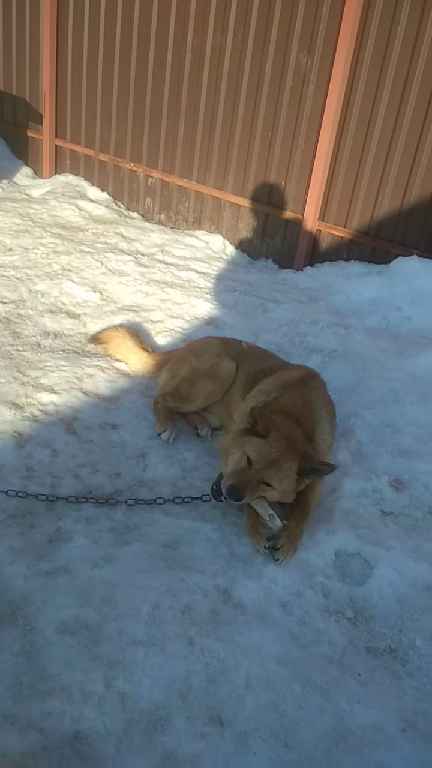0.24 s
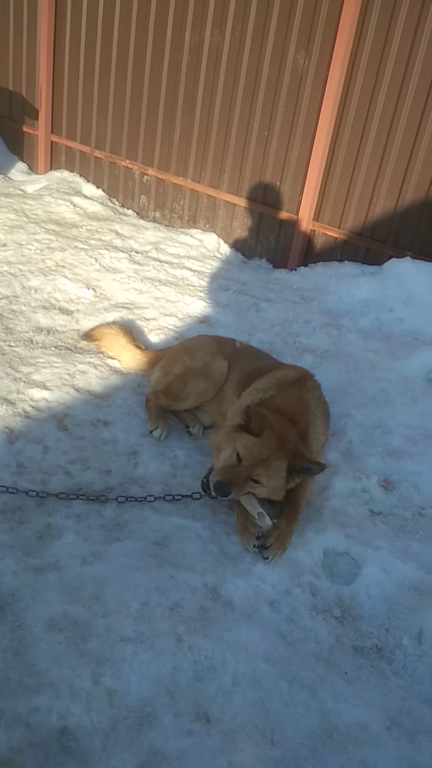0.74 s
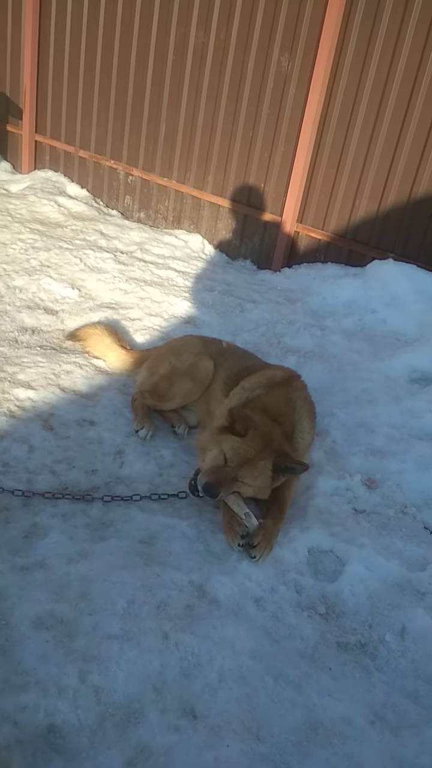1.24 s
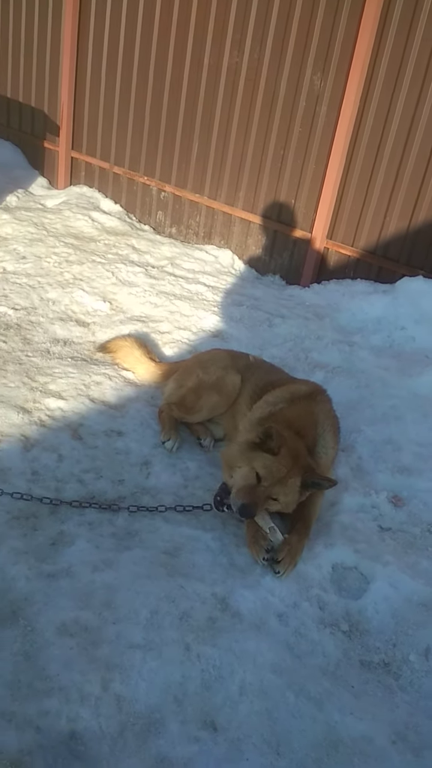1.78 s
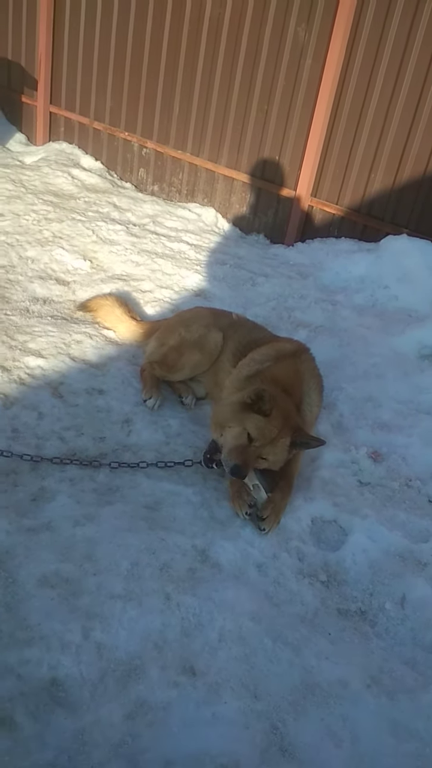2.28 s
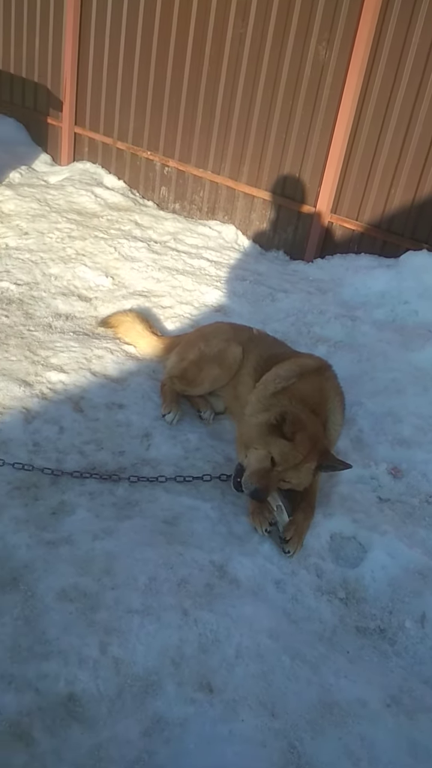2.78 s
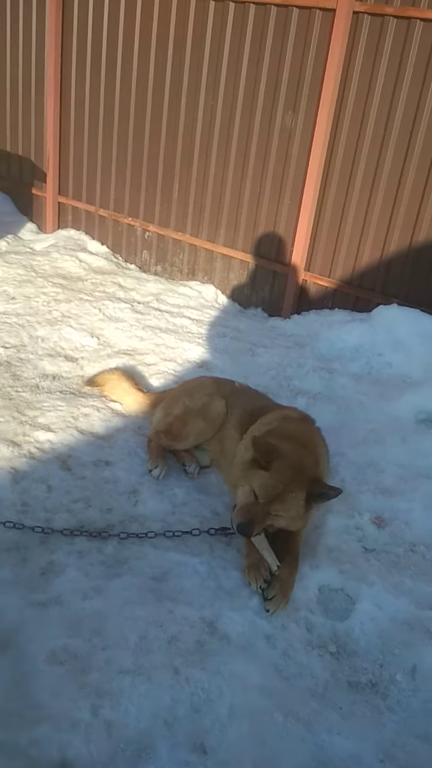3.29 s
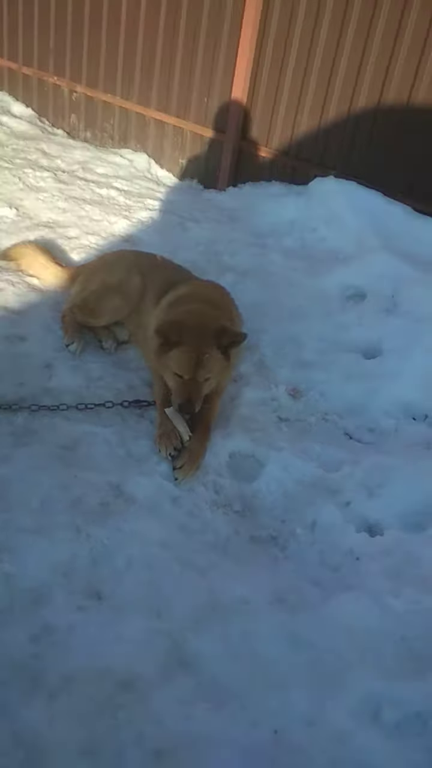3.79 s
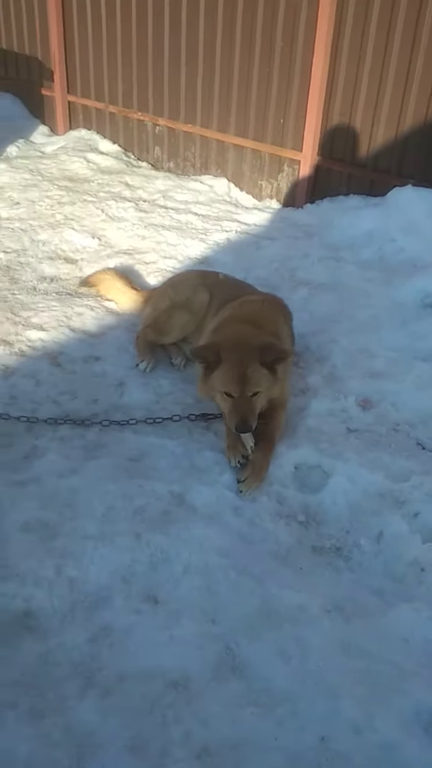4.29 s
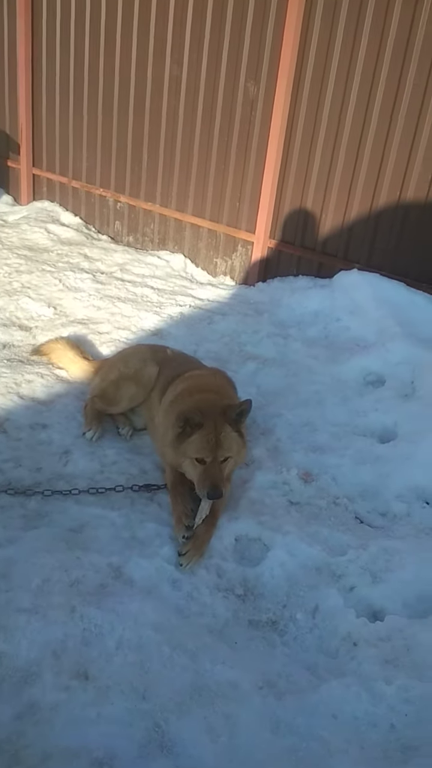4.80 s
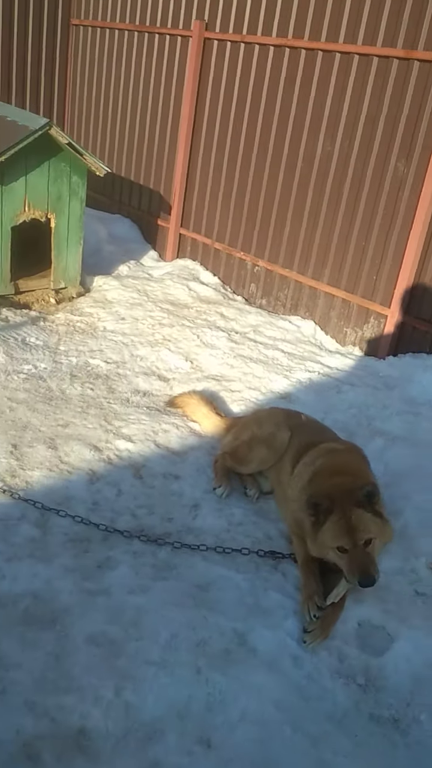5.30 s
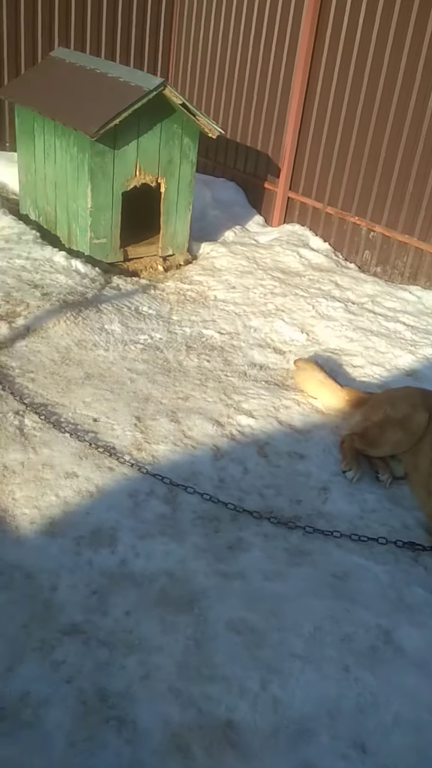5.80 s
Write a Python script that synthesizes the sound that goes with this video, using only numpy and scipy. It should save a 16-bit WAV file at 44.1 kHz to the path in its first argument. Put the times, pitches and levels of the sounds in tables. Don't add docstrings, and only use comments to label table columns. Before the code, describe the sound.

Teeth knock and splinter a hollow bone in uneven bites, with small chips and dry high ticks crowding the last seconds. Faint snow squeaks and rustles surround it, with light gusts rumbling low. Close to the left microphone, skin drags, hisses and pops on the case, strongest just before four seconds. A brief metallic chain grind comes late; the open yard adds only a slight echo.

```python
import sys
import numpy as np
from scipy import signal
from scipy.io import wavfile
from scipy.ndimage import uniform_filter1d, minimum_filter1d

SR = 44100
rng = np.random.default_rng(int(sys.argv[2]) if len(sys.argv) > 2 else 0)


def linear_from_db(decibels):
    return 10 ** (np.asarray(decibels, float) / 20)


def digitize_waveform(pressure):
    field = np.atleast_2d(pressure).T
    bounded = np.clip(field, -1, 1)
    quanta = np.round(bounded * 32767).astype(np.int16)
    wavfile.write(sys.argv[1], SR, quanta)


N = 266354
T = np.arange(N) / SR

# start in seconds, level in dB, ring in Hz, crack in dB re knock, t60 in seconds.
KNOCKS = [(.373, -22.5, 302, -20, 0.0095), (1.043, -35.5, 794, -13, 0.013), (1.942, -56.5, 347, -1.5, 0.05),
          (1.986, -51, 786, 6.5, 0.11), (2.44, -39.5, 752, -26, 0.033), (2.482, -45, 720, -7.5, 0.021),
          (2.55, -29, 732, -41, 0.03), (3.118, -50, 800, -6, 0.094), (3.614, -43, 336, 1, 0.085),
          (3.681, -34, 410, -14, 0.0079), (4.088, -38, 734, -11, 0.025), (4.164, -46, 660, -14, 0.051),
          (4.339, -40, 479, -18, 0.1), (5.088, -44.5, 433, -32, 0.04), (5.507, -42, 277, -16, 0.016),
          (5.601, -34, 1570, -15, 0.0066), (5.937, -19.5, 410, -29, 0.0086), (5.966, -32, 1430, -9, 0.0074)]
# start in seconds, level in dB, ring in Hz, crack in dB re knock, left-right in dB.
CRACKS = [
    (.86, -46, 670, -6, 14),
    (.982, -34.5, 798, 5, -6),
    (.989, -39.5, 1150, 11, 7.5),
    (3.451, -71, 1460, 21, -4),
    (4.258, -52, 1030, -4, -4),
    (4.596, -55.5, 1120, 14.5, -10.5),
    (4.661, -60, 1006, 7.5, -28),
    (4.67, -53.5, 990, 4, 6),
    (4.73, -58.5, 1500, 12.5, -13),
    (5.575, -62.5, 1800, 13, 26),
]
KNOCK_PAN_DB, CRACK_T60_S = 0.5, 0.03
# start in seconds, level in dB, ring in Hz, left-right in dB on top of
# a # fixed 8 dB to the left.
TICKS = [(2.69, -52.5, 5740, -12), (2.704, -49, 10500, -7), (3.671, -46, 13100, 26),
         (3.716, -38, 12900, 13), (3.7394, -43, 13700, 23), (3.747, -33.5, 13200, 21),
         (4.087, -51, 4300, 7), (4.461, -42.5, 6600, 15), (4.495, -41.5, 6460, 19), (4.547, -40, 11000, 0),
         (4.669, -30.5, 7170, 1), (4.699, -47, 4620, 14), (4.784, -49, 7400, 8), (4.835, -51.5, 10400, -4),
         (5.027, -48, 7950, 5.5), (5.288, -47, 13500, 10), (5.3038, -37, 13200, 8),
         (5.3353, -33.5, 12600, 15), (5.3502, -36, 13600, 18), (5.3614, -50, 8700, 8),
         (5.441, -40.5, 9400, 18), (5.456, -36, 10000, 11), (5.4914, -38.5, 13500, 12),
         (5.51, -32.5, 11750, 7), (5.521, -44, 7140, 7), (5.567, -38, 12200, 13), (5.5814, -42, 10650, 7),
         (5.589, -45, 12000, 10), (5.619, -44, 11500, 12), (5.67, -40, 13560, 15), (5.688, -54, 13000, 10),
         (5.696, -42, 9000, 16), (5.7106, -40.5, 6400, 15), (5.7162, -43, 11300, 15),
         (5.741, -38, 12200, 16), (5.79, -42.5, 11000, 8), (5.851, -41, 10000, 14)]
TICK_DB, TICK_FADE_S, TICK_RING = -2.5, 0.0005, 0.95
# start in seconds, level in dB, ring in Hz, t60 in seconds.
NIBBLES = [(.374, -28, 3330, 0.0085), (3.96, -23.5, 2250, 0.019), (4.576, -44, 3500, .015),
           (4.586, -48, 3460, 0.024), (4.598, -44, 3490, 0.02), (4.63, -50, 3950, 0.027),
           (4.333, -43, 505, 0.024), (4.35, -53, 485, .06), (4.698, -34, 1620, 0.007),
           (5.466, -50, 1310, .014), (5.495, -62, 1310, 0.01), (5.51, -47, 1500, 0.0095),
           (5.656, -45, 1690, 0.008), (5.697, -52, 1490, 0.011), (5.713, -49.5, 1400, 0.037),
           (5.754, -49, 1380, 0.0093), (5.763, -48, 1520, 0.011), (5.782, -50, 1490, 0.016),
           (5.805, -50, 1530, .012), (5.916, -56, 1520, 0.0096), (6.016, -47, 1690, 0.013)]
# start in seconds, level in dB, pitch in Hz, length
WAVELETS = [(.311, -43, 850, 5), (.981, -42, 3450, 7.5), (.983, -41.5, 1380, 6), (1.43, -58, 850, 8.9),
            (1.82, -59, 823, 9), (2.322, -65.5, 1235, 32), (2.44, -56, 1280, 9.5), (2.55, -60, 1270, 20),
            (3.405, -50, 280, 2.7), (3.925, -57, 1100, 5.8), (3.959, -32.5, 1280, 15), (4.05, -61, 1500, 2.3),
            (4.077, -43, 2730, 6.2), (4.222, -54, 1810, 6), (4.243, -49, 1830, 6.7), (4.595, -59, 470, 3),
            (4.66, -48, 463, 3.5), (4.668, -39.5, 1840, 4.7), (5.511, -49, 643, 3), (5.541, -51, 912, 1.7),
            (5.658, -45.5, 2400, 4.5), (5.67, -62, 1500, 3.7), (5.688, -63, 1310, 3), (5.737, -53, 583, 4),
            (5.772, -50, 1380, 3.3), (5.887, -57, 1500, 3), (5.905, -50, 1530, 3.4), (5.937, -30.5, 1580, 5.4),
            (6.016, -42, 1110, 2.3)]

# start in seconds, length in seconds, level in dB.
CHINKS = [
    (5.143, 0.022, -47.5),
    (5.165, 0.028, -40.5),
    (5.324, 0.04, -43),
]
# frequency in Hz, width in Hz, level in dB.
LINK_MODES = [(2780, 170, -4), (4170, 170, 3.5), (7320, 49, -1.5), (10200, 500, -40), (11500, 59, 8.5),
              (13200, 66, 9), (14000, 110, -4)]

# time in seconds, creep speed in dB, pressure in dB.
RUB = [(0, -99, -89), (.97, -82, -72), (1.0, -70, -86), (1.34, -56, -52.5), (1.58, -63.5, -65),
       (1.72, -91.5, -92.5), (2.27, -99, -88), (2.74, -93, -73.5), (3.4, -37.5, -46), (3.66, -87, -60.5),
       (3.95, -60, -58.5), (4.25, -53, -59), (4.47, -58.5, -79), (4.78, -59.5, -77), (5.17, -55.5, -102),
       (5.3, -64, -98), (5.57, -60.5, -94), (6.04, -59, -88)]
# start in seconds, length in seconds, speed, pressure and swell in dB.
SLIDES = [(0.285, 0.069, -62.5, -54, -9.5), (0.644, 0.12, -64.5, -57, -7), (1.129, 0.095, -65, -52, -8),
          (1.242, 0.11, -69, -57, -15), (1.355, 0.066, -67, -58.5, -1), (2.035, 0.1, -90, -57, -6),
          (2.981, 0.085, -46.5, -92, -2), (3.044, 0.073, -47, -89, 27), (3.161, 0.16, -28.5, -45, 5),
          (3.287, 0.12, -37, -50.5, -40), (3.442, 0.23, -38, -48.5, 0.5), (3.655, 0.18, -67, -55, -32),
          (3.809, 0.021, -42, -40.5, 22), (3.909, 0.032, -37, -41.5, 26), (4.497, 0.23, -54.5, -58, 0),
          (4.188, 0.12, -79, -64.5, 6), (4.357, .08, -80, -59, -9), (5.321, 0.038, -55, -100, -27)]
# start in seconds, length in seconds, speed, pressure and swell in dB.
JERKS = [(0, 0.083, -83, -74, -23), (0.818, 0.073, -84, -55, -4), (1.506, 0.063, -56.5, -57.5, -18),
         (1.99, 0.17, -65, -93, -14), (2.761, 0.22, -52, -57.5, -6.5), (3.826, 0.028, -29.5, -35.5, 10),
         (3.951, 0.11, -41.5, -44.5, -25.5), (4.281, 0.095, -50, -56, -3), (4.654, 0.023, -41.5, -67, -12),
         (4.721, 0.061, -49, -61, -9), (5.935, 0.0065, -40, -35.5, -6)]
SLIDE_SOFT, JERK_EASE_S = 0.77, 0.016
SETTLE_DB, SETTLE_DB_PER_S = -19.5, 186.5
LIFT_S, LIFT_LENGTH_S = 3.936, 0.016
# start in seconds, snap in dB, air push in dB re snap.
SNAPS = [
    (3.1203, -33, -30),
    (3.696, -18, 0),
    (3.8194, -42, -18),
    (3.8465, -25.5, 16),
    (3.8845, -32, -4),
    (4.05, -29, -12),
    (4.077, -31.5, -18),
    (4.129, -22.5, 6.5),
    (4.588, -34, -27),
    (5.5415, -25, -40),
]
# start in seconds, level in dB, length in ms, signed direction.
PUSHES = [
    (1.51, -29, 3, -1.7),
    (3.698, -12.5, 0.3, -1.56),
    (3.811, -6.5, 2.4, 0.42),
    (3.8194, 3.5, 0.95, 1),
    (3.8476, 2, 0.74, -0.9),
    (4.13, -13, 0.67, 0.076),
]
# start in seconds, length in seconds, level in dB.
WHISPERS = [
    (.62, .13, -63.5),
    (2.746, 0.026, -44.5),
    (3.668, 0.2, -46.5),
    (3.767, 0.0022, -34),
    (3.77, .025, -60),
    (3.815, 0.024, -27),
    (4.19, 0.096, -54),
    (4.933, .008, -46),
    (4.947, 0.0026, -39.5),
    (4.953, 0.0069, -45),
]
POP_S, POP_DB, POP_WIDTH_S = 5.5422, -26, .00006
# frequency in Hz, level in dB per Hz.
HISS_COLOUR = [(1500, -9), (3000, -11.5), (5500, -5.5), (7500, -1), (9000, 2), (11000, 5), (13000, 4.5),
               (15000, -1.5)]
DRAG_COLOUR = [(150, -59), (300, 5), (450, 2.5), (1000, -3.5), (2000, -8.5), (4000, -15.5), (8000, -27),
               (15000, -25)]
THUMP_COLOUR = [(40, -30), (100, -1.5), (250, 3.5), (400, -37.5), (900, -16.5)]
WHISPER_COLOUR = [(7000, -15), (8800, -3.5), (11000, 6), (14000, 0), (16000, 1)]

# time in seconds, paws on the crust in dB, body weight in dB.
STIR = [(0, -100, -100), (.5, -87, -84), (.83, -108, -84), (1.15, -81.5, -97), (1.74, -100, -79),
        (1.97, -74, -75.5), (2.22, -91, -95), (2.39, -66, -76), (2.97, -93.5, -88), (3.58, -59.5, -96),
        (3.98, -103, -67), (4.11, -68, -62), (4.5, -73, -102), (4.96, -59.5, -64.5), (5.35, -65.5, -100),
        (6.04, -54.5, -97)]
# start in seconds, crisp in dB, dull in dB, fade in dB per second.
TUGS = [(0, -94, -61, 121), (.36, -68.5, -57, 150), (0.852, -61, -66, 122), (0.979, -46, -58, 169),
        (1.978, -58, -63.5, 139), (2.065, -84, -49, 173), (2.427, -66, -64.5, 60), (2.539, -57.5, -58, 191),
        (2.66, -69.5, -93, 40), (3.081, -50.5, -70, 68), (3.6, -49, -67, 256), (3.678, -60, -47, 251),
        (3.756, -53.5, -61, 218), (4.323, -54, -58.5, 104), (4.566, -44, -59, 152), (4.67, -99, -57, 118),
        (4.75, -55.5, -96, 188), (5.504, -99, -60.5, 57), (5.69, -67, -66, 64), (4.19, -54.5, -62, 60),
        (5.05, -53.5, -80, 64), (5.926, -78, -56, 121)]
TUG_RISE_S = 0.0093
# time in seconds, frequency in Hz.
HOLLOW = [(0, 795), (2, 730), (3.3, 787), (3.6, 403), (4.05, 386), (4.12, 688), (4.3, 503), (5.2, 394),
          (5.45, 1296), (5.58, 1596), (5.66, 1790), (5.72, 1460), (5.8, 1540), (5.9, 1330), (5.97, 1730),
          (6.04, 1180)]
NARROW_HZ, OPEN_HZ = 600., 1500.
# start in seconds, length in seconds, level in dB.
SQUEAKS = [
    (.385, .17, -73),
    (1.57, .1, -76),
    (1.98, .17, -72),
    (2.31, .15, -69),
    (2.44, .16, -66),
    (2.6, .22, -69),
]
# start in seconds, length in seconds, level in dB.
NARROW_HISS = [
    (0, 0.29, -87.5),
    (0, .24, -86.5),
    (0, 0.16, -85),
    (.35, 0.11, -95.5),
    (2.3, 0.3, -79.5),
]
# frequency in Hz, level in dB per Hz.
CRISP_COLOUR = [(2050, -13.5), (3100, -7), (4000, -7), (5800, -7), (7400, -11.5), (10500, -0.5),
                (13000, -5), (15500, -6)]
DULL_COLOUR = [(200, 0), (450, 36), (750, -33.5), (1000, -11), (1400, 11), (2000, -4.5), (3000, -25.5),
               (6000, 7)]
SQUEAK_COLOUR = [(2200, -30), (3100, -4), (4100, -24), (5900, -2), (7600, -22), (10500, 2), (13000, -4),
                 (15500, -18)]
NARROW_HISS_COLOUR = [(2450, -45), (2800, -8), (3050, -2), (3330, -7), (3600, -55)]
FLOOR_COLOUR = [(300, 0), (900, 15.5), (2200, -25.5), (9000, -38)]
FLOOR_DB = -102
# frequency in Hz, t60 in seconds.
FENCE_T60 = [(300, 0.22), (800, 0.3), (2500, 0.11), (10000, 0.031)]

# time in seconds, level in dB.
WIND = [(0, -68), (.18, -69.5), (.3, -49.5), (.47, -56.5), (1.1, -60), (1.26, -61.5), (1.6, -58.5),
        (1.87, -65.5), (2.24, -62.5), (2.33, -53), (2.5, -55), (3.2, -57.5), (3.56, -47), (4.13, -54.5),
        (4.64, -54.5), (4.92, -41), (5.2, -55.5), (6.04, -49.5)]
# centre in seconds, level in dB over the breeze.
PUFFS = [
    (1.41, 6),
    (4.04, 9),
    (4.22, 5),
    (4.74, 6.5),
    (5.3, 5.5),
    (5.42, 6.5),
    (5.57, 10.5),
    (5.65, -10),
    (5.73, 8),
]
PUFF_S = 0.046
# frequency in Hz, level in dB per Hz.
GUST_COLOUR = [(20, 3.5), (45, 1), (80, -2.5), (130, -3), (170, -13), (300, -24), (600, -38), (2000, -93)]
STRAND_HZ, STRAND_FIRST_HZ, STRAND_DB = 50.82, 30.4, 5

# frequency in Hz, level in dB.
KEPT = [(800, -125), (2200, -117), (4200, -111), (7000, -107), (11000, -106), (14000, -100), (15900, -92),
        (16100, 0)]


def evened(x):
    return x / np.sqrt(np.mean(x ** 2) + 1e-20)


def read(points, hz):
    f, value = np.transpose(points)
    return np.interp(np.log(hz + 1), np.log(f + 1), value)


def curves(rows):
    s, *columns = np.transpose(rows)
    return [linear_from_db(np.interp(T, s, c)) for c in columns]


def smooth_twice(x, size):
    return uniform_filter1d(uniform_filter1d(x, size=size), size=size)


def add(mix, s, sound):
    part = mix[..., round(s * SR):][..., :sound.shape[-1]]
    part += sound[..., :part.shape[-1]]


def spells(rows, soft):
    level = np.zeros(N)
    for s, length_s, db in rows:
        add(level, s, linear_from_db(db) * signal.windows.tukey(round(length_s * SR), np.clip(soft, .02, 1)))
    return level


def coloured(x, colour, patch_db, wide, long):
    hz, _, z = signal.stft(x, SR, nperseg=512)
    patches = rng.standard_normal(z.shape[::-1]).T
    patches = uniform_filter1d(uniform_filter1d(patches, wide, 0), long, 1)
    z = z * linear_from_db(read(colour, hz)[:, None] + patch_db * evened(patches))
    return evened(signal.istft(z, SR, nperseg=512)[1][:N])


def grit(per_s, spread_db, smooth):
    slips = linear_from_db(spread_db * np.minimum(rng.exponential(1, N), 4)) * rng.choice([-1, 1], N)
    return evened(slips * (rng.random(N) < per_s / SR)) + smooth * rng.standard_normal(N)


def bone():
    out, t = np.zeros((2, N)), np.arange(3000) / SR
    bites = [(*row[:4], KNOCK_PAN_DB, row[4]) for row in KNOCKS]
    bites += [(*row, CRACK_T60_S) for row in CRACKS]
    noises = rng.standard_normal((len(bites), 3, 3000))
    rise = 1 - np.exp(-t / .0004)
    for (s, db, hz, crack_db, pan_db, t60_s), noise in zip(bites, noises):
        fade = linear_from_db(-60 * t / max(t60_s, .004)) * rise
        ring = np.cos(2 * np.pi * hz * t) + 0.059 * np.cos(2 * np.pi * 0.37 * hz * t)
        ring += 0.029 * np.cos(2 * np.pi * 1.1 * hz * t) * fade
        ring += 0.21 * smooth_twice(noise[0], 20)
        splinter = 0.11 * noise[0] + 0.47 * noise[1:] + 0.12 * np.sin(2 * np.pi * 3400. * t)
        splinter = 0.8 * (splinter + 0.75 * np.roll(splinter, 10, axis=1))
        crack = linear_from_db(crack_db) * splinter * rise * np.exp(-t / .002)
        pan = np.array([[pan_db / 2], [-pan_db / 2]])
        add(out, s, linear_from_db(db + pan) * (0.86 * ring * fade + 2.24 * crack))
    return out


def ticks():
    out, t = np.zeros((2, N)), np.arange(1500) / SR
    fade = np.exp(-t / TICK_FADE_S) + 0.12 * np.exp(-t / 0.0063)
    noises = rng.standard_normal((len(TICKS), 2, 1500))
    for (s, db, hz, pan_db), noise in zip(TICKS, noises):
        click = np.diff(noise[0] + 0.23 * noise, prepend=0) * 0.84
        click = click + TICK_RING * np.sin(2 * np.pi * hz * t)
        add(out, s, linear_from_db(db + TICK_DB + np.array([[3], [-5.0 - pan_db]])) * click * fade)
    return out


def nibbles():
    out, t = np.zeros((2, N)), np.arange(1500) / SR
    for (s, db, hz, t60_s), noise in zip(NIBBLES, rng.standard_normal((len(NIBBLES), 1500))):
        ring = np.sin(2 * np.pi * hz * t) * (1 + 0.3 * uniform_filter1d(noise, size=40))
        fade = linear_from_db(db - 60 * t / max(t60_s, .004)) * (1 - np.exp(-t / 0.0013))
        add(out, s, ring * fade * linear_from_db([[1.5], [-1.5]]))
    return out


def wavelets():
    out, t = np.zeros((2, N)), np.arange(2000) / SR
    for (s, db, hz, cycles), noise in zip(WAVELETS, rng.standard_normal((len(WAVELETS), 2, 2000))):
        u = t * hz / max(cycles, 1)
        rough = 1 + 0.4 * uniform_filter1d(noise, size=30)
        shape = (1 - np.exp(-25 * u)) * np.exp(-3.0 * u)
        add(out, s, linear_from_db(db) * np.sin(2 * np.pi * hz * t) * rough * shape)
    return out


def chain():
    scrape = np.zeros(N)
    for s, length_s, db in CHINKS:
        size = round(length_s * SR)
        add(scrape, s, linear_from_db(db) * np.exp(-2.0 * np.arange(size) / size))
    scrape = scrape * grit(3000, 0.36, 0.19)
    t = np.arange(600) / SR
    ring = sum(linear_from_db(db) * np.sin(2 * np.pi * hz * t) * np.exp(-np.pi * width_hz * t)
               for hz, width_hz, db in LINK_MODES)
    return signal.oaconvolve(scrape, ring / np.linalg.norm(ring))[:N]


def stroke_levels():
    level = np.array(curves(RUB))
    strokes = [(*row, SLIDE_SOFT) for row in SLIDES]
    strokes += [(*row, JERK_EASE_S / row[1]) for row in JERKS]
    for s, length_s, speed_db, pressure_db, swell_db, soft in strokes:
        size = round(length_s * SR)
        shape = linear_from_db(swell_db * np.linspace(-.5, .5, size))
        shape = shape * signal.windows.tukey(size, np.clip(soft, .02, 1))
        settle = linear_from_db(SETTLE_DB + swell_db / 2 - SETTLE_DB_PER_S * T[:SR // 4])
        shape = np.maximum(shape, settle[0] * np.linspace(0, 1, size))
        add(level, s, linear_from_db([[speed_db], [pressure_db]]) * np.append(shape, settle))
    return level * (1 - .97 * spells([(LIFT_S, LIFT_LENGTH_S, 0)], 0.18))


def rubbing():
    speed, pressure = stroke_levels()
    out = speed * coloured(grit(8000, 1.8, 1.4), HISS_COLOUR, 1.8, 8, 3)
    out += .05 * speed * coloured(grit(90, 3.0, 0), HISS_COLOUR, 0, 8, 3)
    out += pressure * coloured(grit(600, 1.6, 0.9), DRAG_COLOUR, 3.3, 5, 3)
    shake = 21.0 * pressure ** 1.638
    out += shake * coloured(grit(300, 0.77, 0.23), THUMP_COLOUR, 2.5, 2, 4)
    out += spells(WHISPERS, 0.18) * coloured(grit(8500, 1.8, 0.77), WHISPER_COLOUR, 5.0, 6, 3)
    return out


def snaps():
    out, t = np.zeros(N), np.arange(1200) / SR
    fade = np.exp(-t / .00025) + .12 * np.exp(-t / .002)
    for (s, db, push_db), noise in zip(SNAPS, rng.standard_normal((len(SNAPS), 1200))):
        snap = (np.sin(2 * np.pi * 10500. * t) + .9 * noise) * fade
        push = linear_from_db(push_db) * np.exp(-t / 0.00094)
        add(out, s + 0.00085, linear_from_db(db + 2.0) * (1.14 * snap - 0.59 * push))
    out += linear_from_db(POP_DB) * np.exp(-((T - POP_S) / POP_WIDTH_S) ** 2)
    for s, db, length_ms, direction in PUSHES:
        u = 1000 * t / length_ms
        surge = u * (1 - 0.7 * u) * np.exp(-1.3 * u)
        add(out, s, direction * linear_from_db(db) * 0.78 * surge)
    return out


def wander():
    wobble = evened(smooth_twice(rng.standard_normal(N), 700))
    return np.interp(T, *np.transpose(HOLLOW)) * (1 + 0.07 * wobble)


def resonate(x, hz, width_hz):
    turn = np.exp(2j * np.pi * np.cumsum(hz) / SR)
    r = np.exp(-np.pi * width_hz / SR)
    smooth = signal.lfilter([1], np.convolve([1, -r], [1, -r]), x / turn)
    return evened((turn * smooth).real)


def hollow(x, hz):
    share = np.clip(hz / 500 - 1.8, 0, .8)
    return np.sqrt(1 - share) * resonate(x, hz, NARROW_HZ) + np.sqrt(share) * resonate(x, hz, OPEN_HZ)


def yard():
    level, t = np.array(curves(STIR)), T[:SR // 2]
    for s, crisp_db, dull_db, fade_db_per_s in TUGS:
        tug_db = np.array([[crisp_db], [dull_db]]) - fade_db_per_s * t
        add(level, s, linear_from_db(tug_db) * np.minimum(t / TUG_RISE_S, 1))
    crisp, dull = level
    ports = []
    for _ in "LR":
        port = crisp * coloured(grit(2500, 3.5, 1.2), CRISP_COLOUR, 3.4, 8, 5)
        port += dull * 0.48 * coloured(grit(530, 2.9, 0.32), DULL_COLOUR, 0.86, 3, 8)
        port += dull * .8 * hollow(grit(200, 3.6, .7), wander())
        port += spells(NARROW_HISS, .08) * coloured(rng.standard_normal(N), NARROW_HISS_COLOUR, 2.5, 2, 4)
        port += spells(SQUEAKS, 0.85) * coloured(grit(3000, 4.6, 0.63), SQUEAK_COLOUR, 2.7, 5, 14)
        port += linear_from_db(FLOOR_DB) * coloured(rng.standard_normal(N), FLOOR_COLOUR, 2.3, 6, 8)
        ports.append(port)
    return np.array(ports) * linear_from_db([[-2.0], [0]])


def breeze():
    return curves(WIND)[0] * linear_from_db(sum(db * np.exp(-((T - s) / PUFF_S) ** 2) for s, db in PUFFS))


def wind():
    hz = np.fft.rfftfreq(N, 1 / SR)
    shared, *own = rng.standard_normal((3, N))
    strands_db = STRAND_DB * np.cos(2 * np.pi * (hz - STRAND_FIRST_HZ) / STRAND_HZ)
    spectrum = np.fft.rfft(shared + 0.17 * np.array(own))
    rumble = np.fft.irfft(spectrum * linear_from_db(read(GUST_COLOUR, hz) + strands_db), N)
    lumps_db = 2.55 * evened(smooth_twice(rng.standard_normal(N), 900))
    return breeze() * evened(rumble * linear_from_db(lumps_db))


def fence(x):
    taps = np.zeros((2, SR // 2))
    at = np.arange(300, SR // 2 - 20, 20) + rng.integers(0, 20, (2, (SR // 2 - 301) // 20))
    np.put_along_axis(taps, at, rng.choice([-1., 1.], at.shape), 1)
    hz, t, z = signal.stft(taps, SR, nperseg=256)
    tail = signal.istft(z * linear_from_db(-60 * t / read(FENCE_T60, hz)[:, None]), SR, nperseg=256)[1]
    return signal.fftconvolve(x, tail / np.linalg.norm(tail[0]), axes=1)[:, :N]


def scene():
    dog = bone() + ticks() + nibbles() + chain() * linear_from_db([[0], [-14.0]])
    hand = rubbing() + snaps()
    leak = linear_from_db(-47.0) * np.diff(hand, prepend=0)
    echo = linear_from_db(-12) * fence(dog)
    return dog + echo + np.array([hand, leak]) + yard() + wind() + wavelets()


def starved(x):
    hz, t, z = signal.stft(x, SR, nperseg=2048)
    band_hz = hz[8:1024:16]
    power = (abs(z[:, :1024]) ** 2).reshape(2, 64, 16, -1).mean(axis=2)
    bands_db = 10 * np.log10(power + 1e-20)
    luck_db = 11.5 * uniform_filter1d(rng.standard_normal(bands_db.shape[::-1]).T, size=3)
    treble_db = np.clip(band_hz[:, None] / 150 - 88, 0, 18)
    own_db = np.median(bands_db[:, 4:46], axis=1, keepdims=True)
    own_db = own_db + [[[-10.5]], [[-7]]] + [[[0]], [[1]]] * treble_db
    masked_db = np.maximum(own_db, bands_db[:, 4:].max(axis=(0, 1)) - 33 + treble_db)
    rumble_db = uniform_filter1d(bands_db[:, :1], size=5)
    masked_db = np.maximum(masked_db, rumble_db - 34) + luck_db
    edge = abs(np.diff(x.sum(axis=0), prepend=0))
    edge_rms = np.sqrt(abs(uniform_filter1d(edge ** 2, size=2048)) + 1e-20)
    crest = -minimum_filter1d(-edge, size=2048) / edge_rms
    masked_db -= 30 * (np.interp(t, T, crest) > 8)
    masked_db[:, :4] = -200
    masked_db[:, 4:9] -= 6
    limit_db = np.maximum(read(KEPT, band_hz)[:, None] + luck_db / 2, masked_db)
    z[:, :1024] *= np.repeat(bands_db > limit_db, 16, axis=1)
    z[:, :1024] *= abs(z[:, :1024]) > linear_from_db(np.repeat(limit_db, 16, axis=1) + 3)
    return signal.istft(z, SR, nperseg=2048)[1][:, :N]


def roll_off(x):
    return signal.sosfilt(signal.butter(12, 16820, fs=SR, output="sos"), x)


def record(dry):
    rounding = linear_from_db(-93.5) * rng.standard_normal(dry.shape)
    return roll_off(starved(dry) + rounding)


dry = scene()
out = record(dry)
digitize_waveform(out)
```